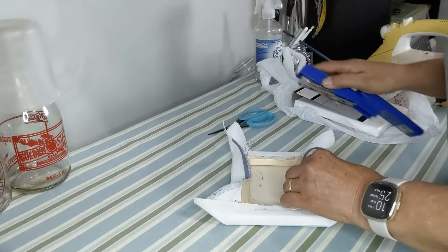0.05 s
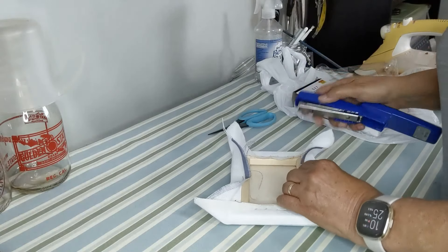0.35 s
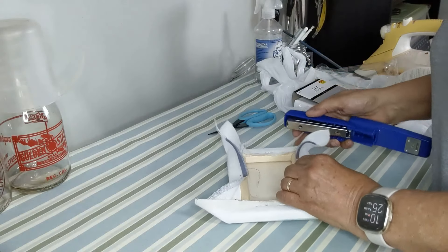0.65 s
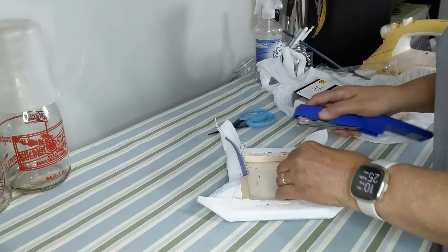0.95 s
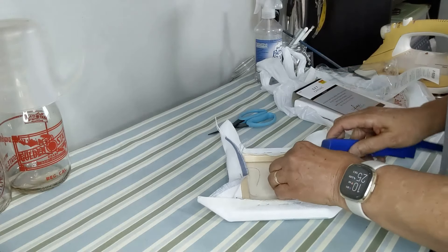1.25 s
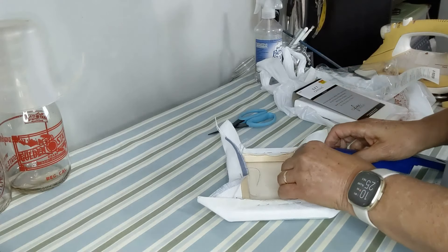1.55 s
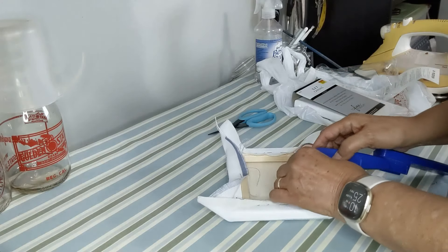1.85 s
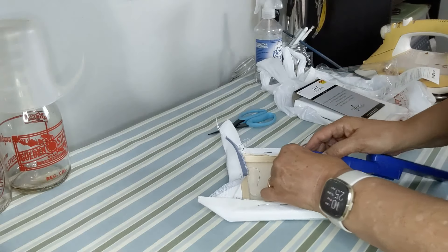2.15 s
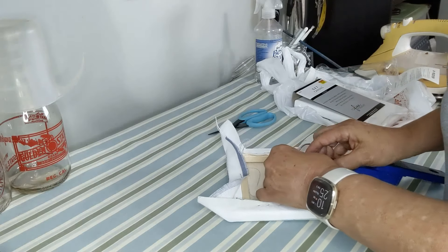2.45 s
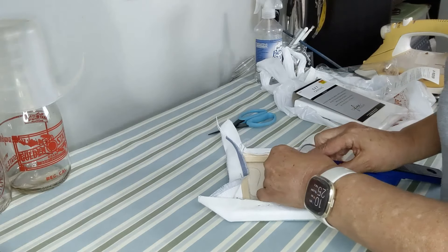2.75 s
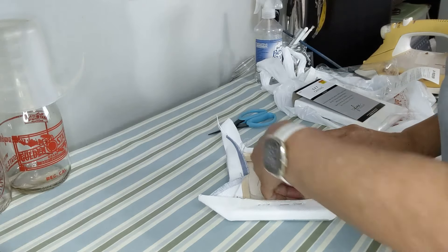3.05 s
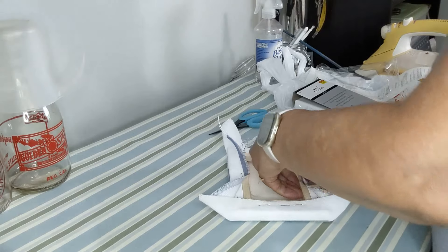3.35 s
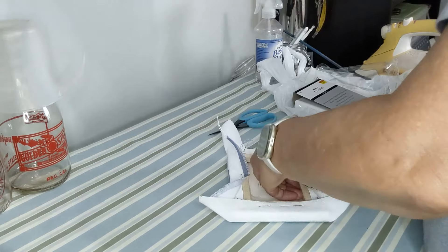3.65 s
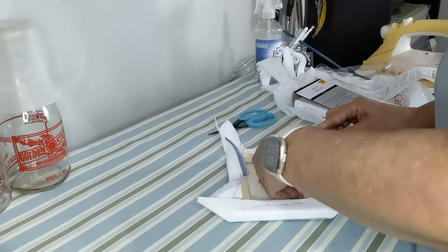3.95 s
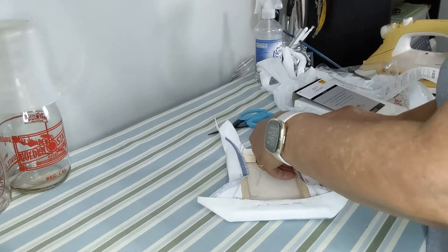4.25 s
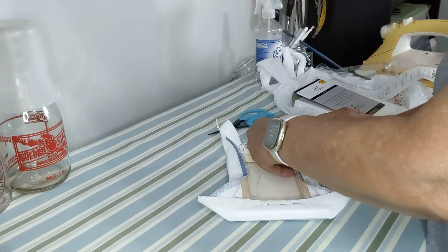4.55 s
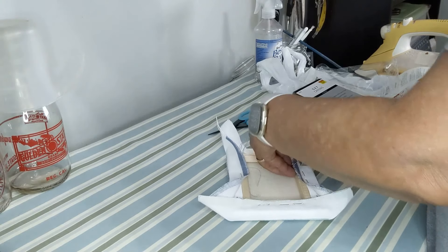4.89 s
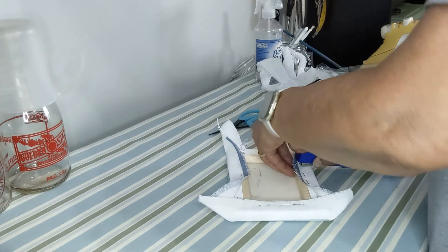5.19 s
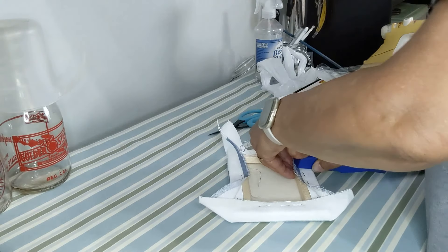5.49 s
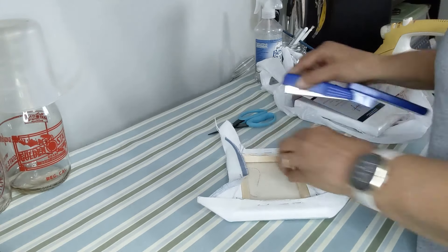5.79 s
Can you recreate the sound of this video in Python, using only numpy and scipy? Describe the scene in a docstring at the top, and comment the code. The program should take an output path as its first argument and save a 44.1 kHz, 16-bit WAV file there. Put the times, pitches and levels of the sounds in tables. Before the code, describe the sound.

A hand stapler drives two staples through fabric into wood, each sharp snap followed by a lighter click, with faint handling ticks between.

```python
"""A hand stapler drives two staples through fabric into a small wooden frame on a table in a small room.
Each impact excites the modes of stapler and table: a steel snap, a thump and a faint ring of the spring.
The arm clatters back about 0.4 s later. Light contacts tick as the stapler is placed, and friction
makes the fabric rustle and the frame scuff. A short reverberation and a quiet rumble lie behind it all."""
import sys
import numpy as np
from scipy import signal
from scipy.fft import rfft, irfft
from scipy.io import wavfile
from scipy.ndimage import uniform_filter1d

SR = 44100
rng = np.random.default_rng(int(sys.argv[2]) if len(sys.argv) > 2 else 0)


def master_out(mix):
    """Clip the mix to full scale and print it as 16-bit PCM to the path in sys.argv[1]."""
    frames = np.transpose(np.atleast_2d(mix))
    ceiling = np.clip(frames, -1, 1)
    pcm = np.round(ceiling * 32767).astype(np.int16)
    wavfile.write(sys.argv[1], SR, pcm)


N = 261279
SIZE, LEAD = 32768, 512  # samples in one sound; samples kept free before an attack
T = np.arange(SIZE) / SR
HZ = np.maximum(np.arange(SIZE // 2 + 1) * SR / SIZE, 1)

# the blade breaks a staple off and sinks it (t/s, relative level/dB, tilt/(dB/octave), ring f/Hz)
DRIVES = [(3.3023, -14.8, -0.6, 3620), (5.1415, -14.5, 0.3, 5330)]
# the arm springs back (t/s, relative level/dB, rattle length/s,
# then the blade coming unstuck: lead/s, relative level/dB, tilt/(dB/octave))
RELEASES = [(3.7278, -33, 0.007, 0.0303, -56.5, -0.5), (5.5587, -30.5, 0.0035, 0.0419, -46, -4.6)]
# modes of the frame on the table (f/Hz, level/dB, T60/s)
TABLE_MODES = [(56, 3, .14), (78, 5.5, .2), (108, 4, .2), (149, -5, .22), (183, -3, .28), (231, -7, .16),
               (275, -8, .3), (310, -13, .24), (366, -6.5, .28), (455, -9.5, .26), (480, -11, .15),
               (512, -7, .2), (651, -12.5, .18), (740, -18, .18), (855, -17, .2), (991, -8, .2)]


def undb(db):
    """Decibels to amplitude ratio."""
    return 10 ** (np.asarray(db) / 20)


def curve(points, hz=HZ):
    """Interpolation of (f/Hz, value) points on a log-frequency axis."""
    f, value = np.transpose(points)
    return np.interp(np.log(hz), np.log(f), value)


def unit(x):
    """Normalisation to rms 1."""
    return x / np.sqrt(np.mean(np.abs(x) ** 2))


def add(out, s, sound):
    """Superposition: mix a sound in from time s."""
    i = int(round(s * SR))
    sound = sound[..., max(-i, 0):N - i]
    out[..., max(i, 0):max(i, 0) + sound.shape[-1]] += sound


def minimum_phase(gain):
    """Causality: the response with this gain that rings only after the blow."""
    cepstrum = irfft(np.log(gain + 1e-9))
    cepstrum[1:SIZE // 2] *= 2
    cepstrum[SIZE // 2 + 1:] = 0
    return np.exp(rfft(cepstrum))


def resonance(hz, width_hz):
    """Power response of a damped oscillator."""
    return 1 / (1 + ((HZ ** 2 - hz ** 2) / (HZ * width_hz)) ** 2)


def ring(modes):
    """Free vibration: modes (f/Hz, level/dB, T60/s) decay exponentially."""
    return sum(undb(db - 60 * T / t60) * np.cos(2 * np.pi * hz * T) for hz, db, t60 in modes)


def contact(s, db, length_s, tilt_db, ring_hz, ring_db, thump_db):
    """One impact; tilt_db is per octave, and thump_db is relative to db."""
    return s, db, length_s, tilt_db, ring_hz, ring_db, db + thump_db


def drives():
    """Impact excitation: a bright snap, then duller blows of the head that ring the same part."""
    # the head bottoms out on the frame (t/s, relative level/dB, contact length/s)
    seatings = [(3.3125, -22.5, 0.0028), (5.1544, -28.5, 0.003), (5.1740, -20, 0.001)]
    for s, db, tilt_db, ring_hz in DRIVES:
        yield contact(s, db, length_s=0.003, tilt_db=tilt_db, ring_hz=ring_hz, ring_db=6.3,
                      thump_db=-15.8)
    for s, db, length_s in seatings:
        thump_db = -19.5 + 10 * np.log10(length_s / 0.0028)  # a longer push moves the table more
        *_, ring_hz = min(DRIVES, key=lambda drive: abs(drive[0] - s))
        yield contact(s, db, length_s, tilt_db=-3.6, ring_hz=ring_hz, ring_db=6.5, thump_db=thump_db)


def releases():
    """Elastic recoil: the blade comes unstuck and scrapes up; the arm hits its stop and rattles."""
    for s, db, rattle_s, lead_s, unstuck_db, unstuck_tilt_db in RELEASES:
        yield contact(s - lead_s, unstuck_db, length_s=0.0033, tilt_db=unstuck_tilt_db,
                      ring_hz=2760, ring_db=6, thump_db=-25)
        yield contact(s - 0.0118, db - 21.5, length_s=0.01, tilt_db=-3.8,
                      ring_hz=1560, ring_db=12, thump_db=-21)
        yield contact(s, db - 2.2, length_s=0.002, tilt_db=-0.8, ring_hz=2400, ring_db=9, thump_db=-21)
        yield contact(s + 0.0027, db, rattle_s, tilt_db=0.3, ring_hz=780, ring_db=4, thump_db=-32)


def ticks(firm_db=-43):
    """Contact time: a lighter touch lasts longer and sounds duller; smaller parts click brighter."""
    # the stapler is handled and set against the frame, and the last row is the arm bouncing once after the
    # second release (t/s, relative level/dB, ring f/Hz)
    touches = [(.245, -70, 2450), (1.2385, -64, 950), (1.402, -73.5, 2200), (1.634, -70.5, 9800),
               (1.879, -71, 1520), (2.220, -42.5, 2000), (2.449, -52.5, 2000), (2.633, -72, 2200),
               (2.7795, -66.5, 3450), (2.8125, -63, 580), (4.1977, -41, 3000), (4.548, -72, 1250),
               (5.4425, -65, 1000), (5.474, -70, 9000), (5.616, -55, 5640)]
    for s, db, ring_hz in touches:
        softer_db = firm_db - db
        length_s = 0.002 * 2 ** (softer_db / 24)
        tilt_db = 1.6 * np.log2(ring_hz / 2600) - 0.1 * softer_db
        yield contact(s, db, length_s, tilt_db, ring_hz, ring_db=9, thump_db=-25)


def chatter(length_s, rise=0.055, fall=0.43):
    """Broadband excitation: the spectrum of metal parts meeting abruptly and parting more slowly."""
    progress = (T - LEAD / SR) / length_s
    envelope = (1 + np.tanh((progress + .5) / rise / 2)) * (1 - np.tanh((progress - .5) / fall / 2))
    burst = rng.standard_normal(SIZE) * envelope
    for _ in range(3):  # flatten the spectrum while keeping the burst short
        even = irfft(np.exp(1j * np.angle(rfft(burst))))
        burst = even * np.sqrt(envelope)
    return unit(rfft(burst)) * np.sqrt(length_s * SR)


def blows(contacts, kind, stereo_width, ring_width_hz=450, steepness=1.4):
    """Modal response: each blow rings the stapler, most of all the part hit, and thumps the table."""
    # steel channel and plastic shell (f/Hz, bandwidth/Hz, level/dB in a drive, a release, a tick)
    body_modes = [(444, 580, -3, -6, -19.5), (830, 200, -12.5, 2, -20), (990, 190, -2.5, 2.5, -14.5),
                  (1494, 300, -2.5, 0, -11), (2070, 230, -26, -20, -4), (2420, 390, -7, 1, -8),
                  (2850, 150, -6, 0, -7), (3260, 330, 2.5, 4, 0), (3550, 250, -5.5, -10, -30),
                  (4060, 300, 1.5, 2, -8.5), (4650, 350, -5, -3, -22), (5200, 260, -7, -0.5, -4.5),
                  (5800, 360, 1, 2.5, -8), (7400, 400, -0.5, 0.5, -6), (7950, 350, -3, 3.5, -31),
                  (9310, 520, 2, 5.5, -8.5), (9720, 300, 1, 2, -4.5), (11280, 750, -4.5, 1.5, -5),
                  (11700, 990, -7.5, -17, -12.5), (13500, 470, -8, 0, -14), (14120, 350, -1, 0, -10),
                  (15276, 200, -7.5, 3, -3)]
    column = ("drive", "release", "tick").index(kind)
    power = sum(undb(levels[column]) ** 2 * resonance(hz, width_hz) ** steepness
                for hz, width_hz, *levels in body_modes)
    # the room gathers all directions, so there the dips between resonances fill in
    fill = 0.55 * np.minimum(HZ / 1500, 1) ** 2
    diffuse_power = power + fill * (uniform_filter1d(power, size=1400) - power)
    hand_damping = undb(-35 * T)
    thump = signal.lfilter(*signal.butter(1, 950, fs=SR), ring(TABLE_MODES)) * hand_damping
    # short waves radiate a little differently to each side
    spread = stereo_width * np.minimum(HZ / 5000, 1)
    out = np.zeros((2, 2, N))  # direct or into the room, left or right, time
    for s, db, length_s, tilt_db, ring_hz, ring_db, thump_db in contacts:
        touch = undb(tilt_db * np.log2(HZ / 4000) + ring_db * resonance(ring_hz, ring_width_hz))
        mid, side = np.array([chatter(length_s), spread * chatter(length_s)]) / np.sqrt(1 + spread ** 2)
        colours = np.sqrt([power, diffuse_power]) * touch / np.sqrt(np.mean(power * touch ** 2))
        snap = irfft([np.array([mid + side, mid - side]) * minimum_phase(colour) for colour in colours])
        add(out, s - LEAD / SR, undb(db + 2.5) * snap)
        add(out, s - length_s / 2, undb(thump_db) * thump)
    return out


def steel_shimmer(detune=0.025, scatter_db=3):
    """Beating: clusters of close steel modes ring on, drawn anew for each drive and release."""
    # channel and coil spring (f/Hz, relative level/dB, T60/s)
    steel_modes = [(1470, -30.5, 1.0), (1690, -17, 1.2), (1905, -23, 1.2), (1905, -18.5, 0.61),
                   (2143, -17.5, 1.5), (2370, -14.5, 1.3), (3070, -23, 0.98), (3290, -4.5, .25),
                   (3570, -8, 0.18), (3700, -4, 0.14), (4070, 1, 0.13), (5685, -7.5, 0.42),
                   (8950, -12, .65), (9600, -12, .65), (11400, -17, .6), (15100, -18, .6)]
    hz, db, t60 = np.repeat(np.array(steel_modes, float), 8, axis=0).T
    out = np.zeros(N)
    for events, coupling_db in (DRIVES, -47.5), (RELEASES, -44.2):
        for s, blow_db, *_ in events:
            offset, share = rng.standard_normal((2, len(hz)))
            shimmer = ring(zip(hz * (1 + detune * offset), db + scatter_db * share, t60))
            add(out, s, undb(coupling_db + blow_db) * shimmer)
    return out


def rubbing(strokes, spectrum, tilt_db, grain_db, stereo_width=0.97):
    """Stick-slip friction: threads catch in uneven grains while a stroke swells and fades."""
    out = np.zeros((2, N))
    middle_s = SIZE / SR / 2
    for s, length_s, db in strokes:
        mid, side, grip = rng.standard_normal((3, SIZE))
        roughness = undb(grain_db * unit(uniform_filter1d(grip, size=90)))
        grains = roughness * np.array([mid + stereo_width * side, mid - stereo_width * side])
        hiss = unit(irfft(rfft(grains) * undb(curve(spectrum) + tilt_db * np.log2(HZ))))
        swell = np.exp(-2 * ((T - middle_s) / length_s) ** 2)
        add(out, s - middle_s, undb(db) * hiss * swell)
    return out


def fabric_rustle(fidget_count=5, fidget_s=0.12):
    """Friction noise: hands slide on the fabric, and fingers shift as the stapler is lined up."""
    # strokes of the hands (t/s, length/s, level/dB)
    strokes = [(.075, 0.055, -62), (.48, 0.069, -68.5), (.59, 0.12, -72), (.87, 0.043, -69),
               (.96, 0.034, -68), (1.54, 0.06, -73), (1.78, 0.03, -72), (2.828, 0.056, -68.5),
               (3.04, 0.035, -71), (4.24, 0.045, -62.5), (5.888, 0.022, -66.5)]
    # friction spectrum of cloth before the tilt (f/Hz, level/dB)
    cloth_spectrum = [(100, -23), (400, 2), (1000, 4.5), (2500, -1.5), (5000, -1.5), (10000, -5.5),
                      (16000, -4.5)]
    jitter, strength = rng.standard_normal((fidget_count, 2)).T
    times = np.linspace(1.2, 2.2, fidget_count) + fidget_s / 2 * jitter
    fidgets = [(s, fidget_s, db) for s, db in zip(times, -75 + 1.5 * strength)]
    return rubbing(strokes + fidgets, cloth_spectrum, tilt_db=0.5, grain_db=3.5)


def frame_scuffs():
    """Sliding friction: the wooden frame shifts on the tablecloth."""
    # slips of the frame (t/s, length/s, level/dB)
    slips = [(.45, 0.03, -71), (2.942, 0.025, -59.5), (2.988, 0.034, -58), (3.915, 0.033, -60)]
    # friction spectrum of the frame before the tilt (f/Hz, level/dB)
    wood_spectrum = [(100, -15.5), (300, 4.5), (560, 0), (750, -8.5), (950, -4.5), (1500, -18),
                     (4000, -26.5), (15000, -45)]
    return rubbing(slips, wood_spectrum, tilt_db=2.1, grain_db=0.5)


def table_bumps(cutoff_hz=65):
    """Low-pass excitation: a soft, slow push reaches only the lowest modes of the table."""
    # the stapler's weight settles (t/s, relative level/dB)
    pushes = [(1.241, -50), (2.21, -58), (3.727, -41), (4.196, -55)]
    out = np.zeros(N)
    thud = signal.lfilter(*signal.butter(3, cutoff_hz, fs=SR), ring(TABLE_MODES))
    for s, db in pushes:
        add(out, s, undb(db) * thud)
    return out


def room(sources, build_s=0.0015, left_lag_s=0.000025):
    """Reverberation: near walls add a short, dense tail to the direct sound, louder on the left."""
    # reverberation time (f/Hz, T60/s)
    decay_times = [(100, .3), (400, 0.3), (1500, .27), (4000, .24), (9000, .24), (16000, 0.18)]
    # gain of the tail against the direct sound (f/Hz, level/dB)
    tail_gain = [(100, -13), (400, -10), (1200, -8), (3000, -9), (6000, -9.7), (10000, -12), (16000, -9.5)]
    # contour of left minus right (f/Hz, level/dB)
    left_excess = [(60, 2), (110, 3), (200, 8.5), (380, 5.5), (700, 5.5), (1290, 8), (2380, 4), (4400, 3.5),
                   (8120, 7.5), (15000, 4.5)]
    centres = np.geomspace(60, 16000, num=9)
    noise = rfft(rng.standard_normal((2, SIZE)))
    noise[1] = np.where(HZ < 200, noise[0], noise[1])  # long waves reach both sides alike
    tail = 0
    for hz, share in zip(centres, np.eye(len(centres))):
        envelope = undb(-60 * T / curve(decay_times, hz)) * (1 - np.exp(-(T / build_s) ** 2))
        band = irfft(noise * np.interp(np.log(HZ), np.log(centres), share))
        tail = tail + band * envelope / np.linalg.norm(envelope)
    pan_db = np.array([[.5], [-.5]]) * (curve(left_excess) + 0.3)
    direct = undb(pan_db) * np.exp(-2j * np.pi * HZ * np.array([[left_lag_s], [0]]))
    diffuse = rfft(tail) * undb(curve(tail_gain) + pan_db)
    responses = np.roll(irfft([direct, diffuse]), LEAD, axis=2)
    return signal.fftconvolve(sources, responses, axes=2).sum(axis=0)[:, LEAD:LEAD + N]


def room_noise(level_db=-64):
    """Spatial coherence: a quiet rumble is alike on both sides, the thin hiss above it is not."""
    # background spectrum (f/Hz, relative level/dB)
    spectrum = [(20, -1.5), (50, -10.5), (90, -17.5), (150, -18.5), (230, -19.5), (410, -26.5),
                (900, -34.5), (1550, -34.5), (2000, -42), (2700, -38), (4800, -42), (5700, -42),
                (10000, -45.5), (16000, -53.5)]
    # likeness of the two sides (f/Hz, correlation)
    coherence = [(60, 0.97), (130, 0.83), (300, 0.067), (700, 0.025)]
    # left minus right (f/Hz, level/dB)
    left_excess = [(40, 0.5), (250, 3), (8000, 2)]
    hz = np.maximum(np.arange(N // 2 + 1) * SR / N, 1)
    likeness = curve(coherence, hz)
    colour = undb(curve(spectrum, hz)) * np.minimum(hz / 20, 1) ** 2
    mid, side = rfft(rng.standard_normal((2, N))) * colour * np.sqrt([1 + likeness, 1 - likeness])
    pan = undb(np.array([[.5], [-.5]]) * curve(left_excess, hz))
    noise = irfft(np.array([mid + side, mid - side]) * pan, N)
    return noise / irfft(mid, N).std() * undb(level_db)


def scene():
    """Superposition of stapler, fabric and frame in the room."""
    stapler = (blows(drives(), "drive", stereo_width=0.75, ring_width_hz=1100)
               + blows(releases(), "release", stereo_width=0.54)
               + blows(ticks(), "tick", stereo_width=0.45, steepness=1.7))
    handling = fabric_rustle() + frame_scuffs() + table_bumps()
    return room(stapler + steel_shimmer() + handling) + room_noise()


def record(dry, ceiling=0.85, cutoff_hz=15900):
    """Soft saturation rounds the loudest peaks; a steep low-pass cuts the highest treble."""
    rounded = ceiling * np.tanh(dry / ceiling)
    return signal.sosfilt(signal.ellip(10, .1, 80, cutoff_hz, fs=SR, output="sos"), rounded)


dry = scene()
out = record(dry)
master_out(out)
```